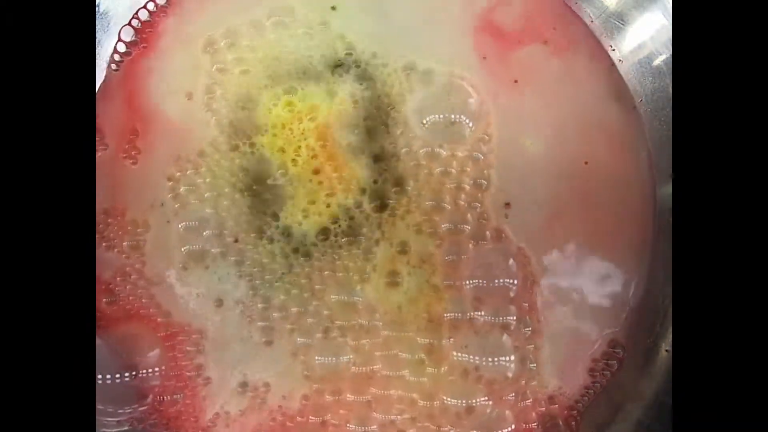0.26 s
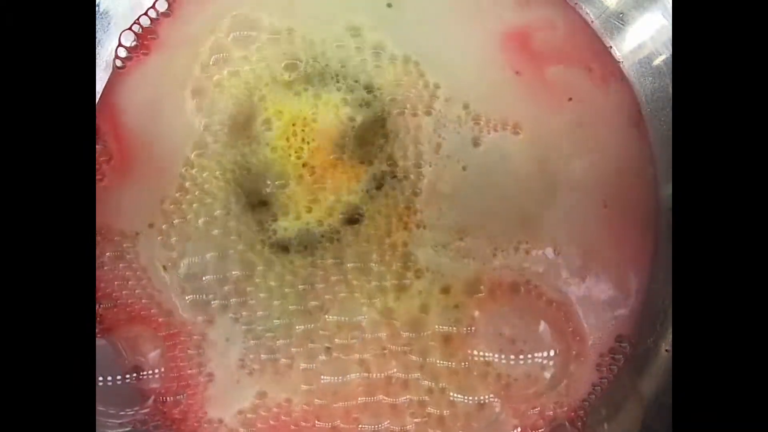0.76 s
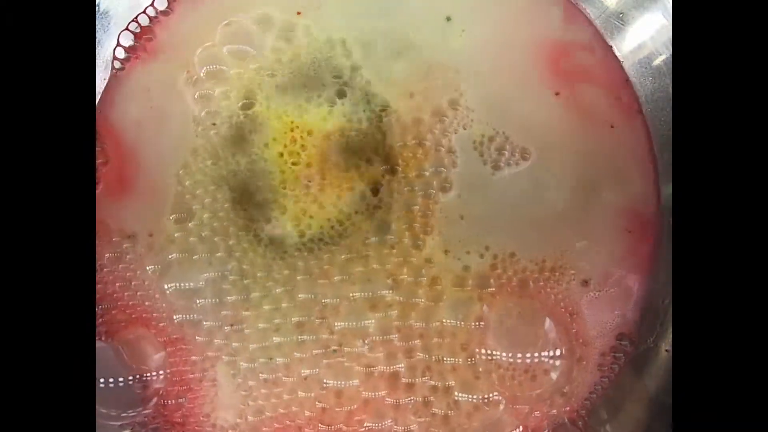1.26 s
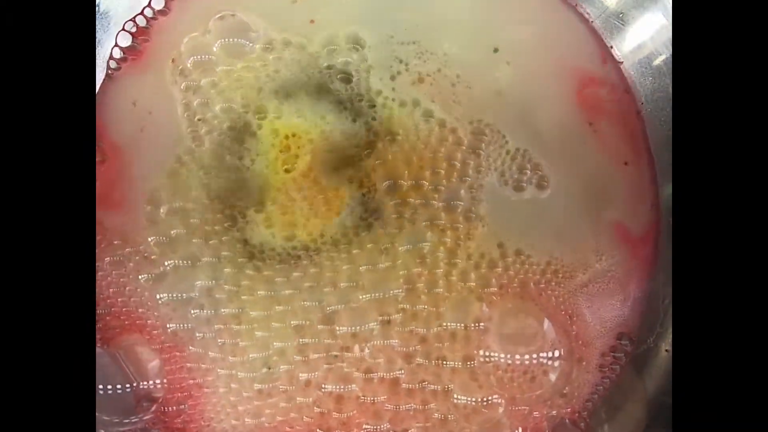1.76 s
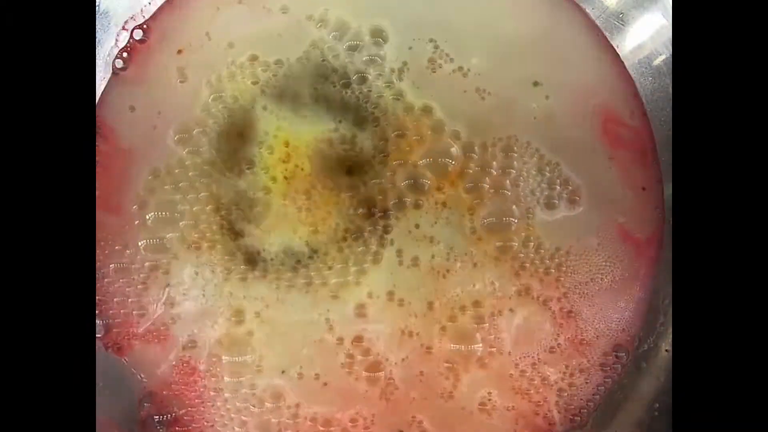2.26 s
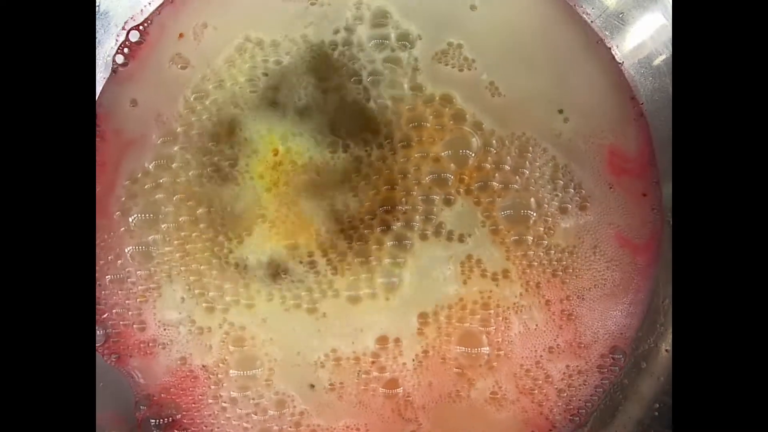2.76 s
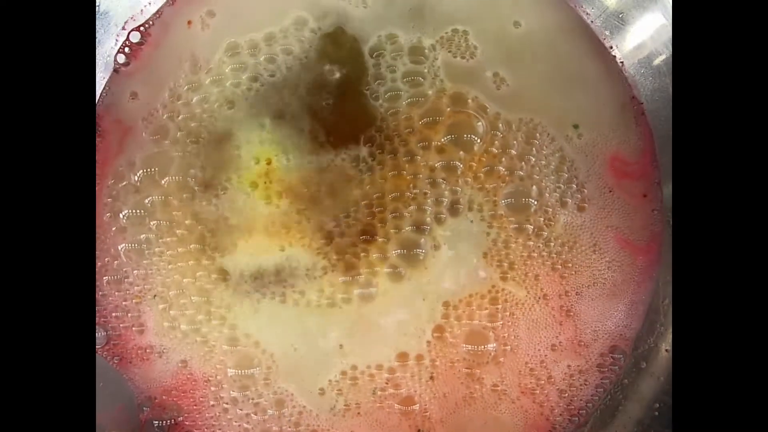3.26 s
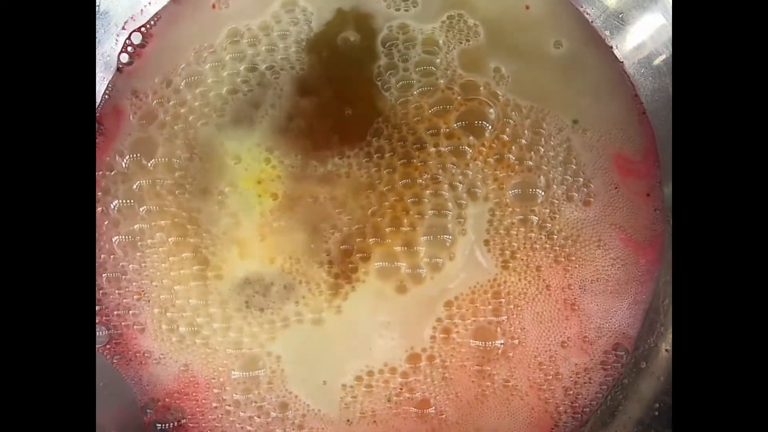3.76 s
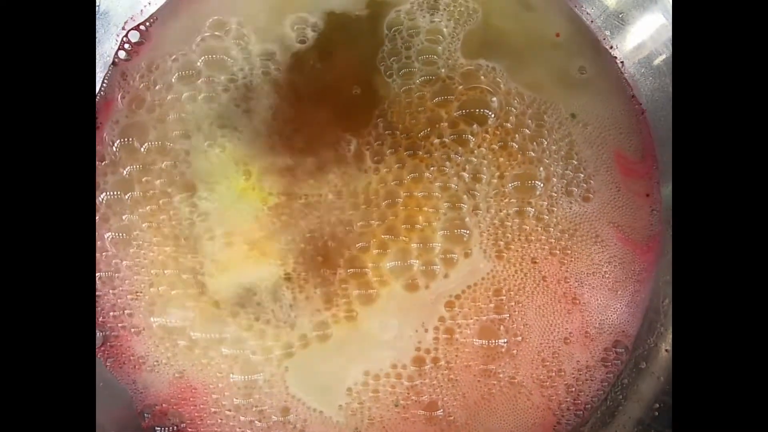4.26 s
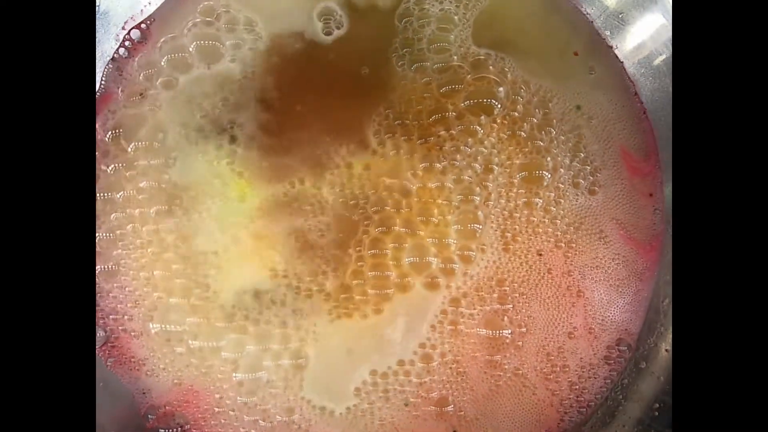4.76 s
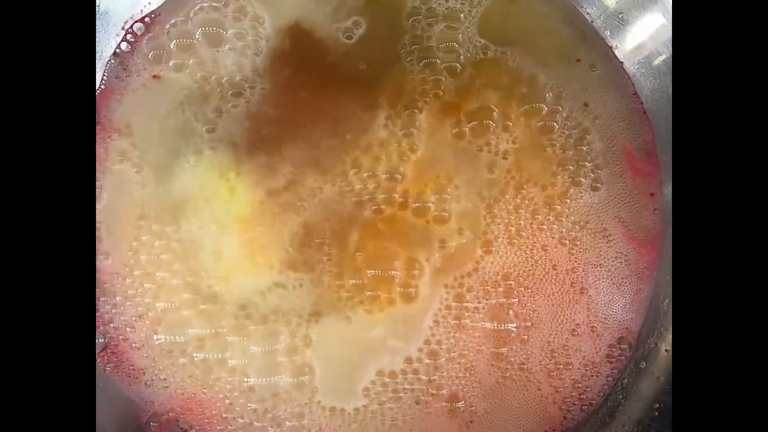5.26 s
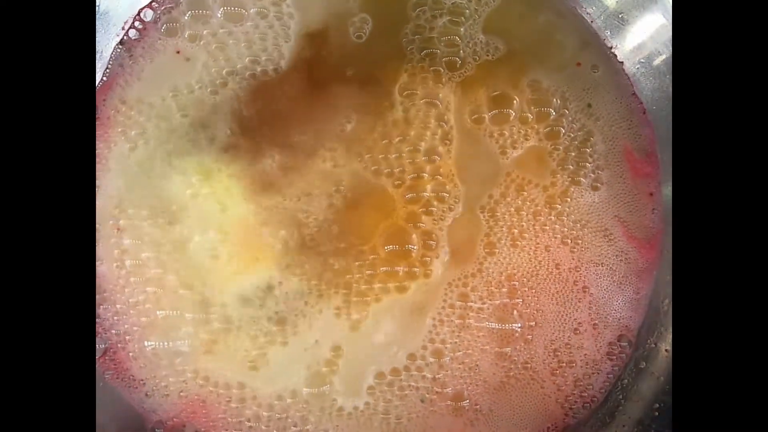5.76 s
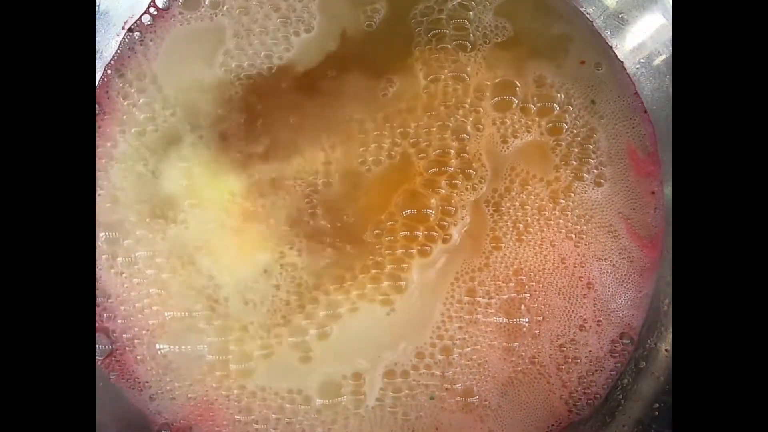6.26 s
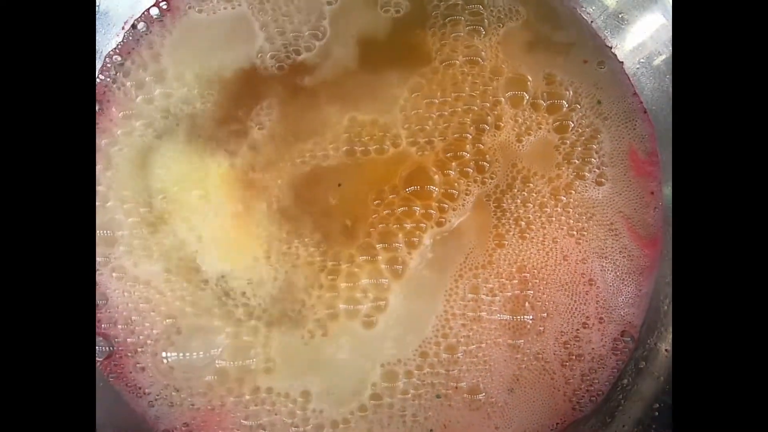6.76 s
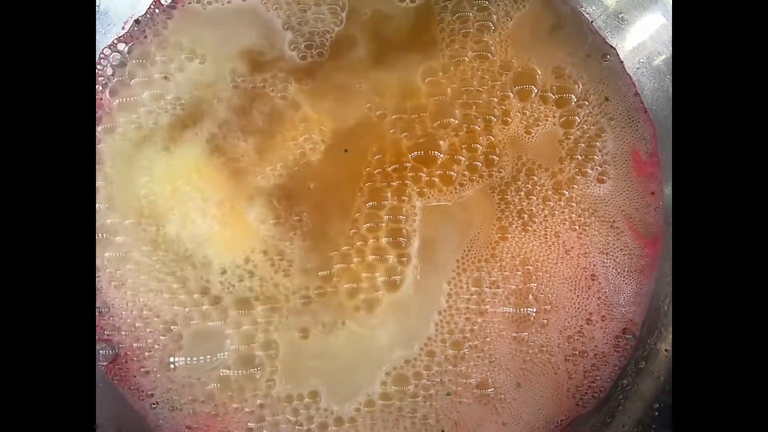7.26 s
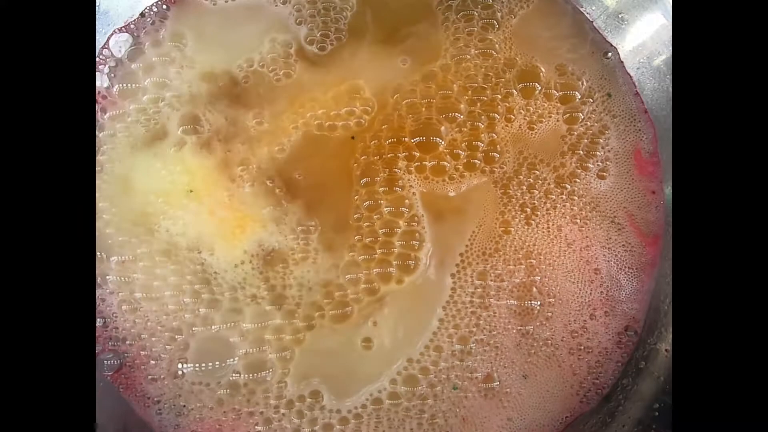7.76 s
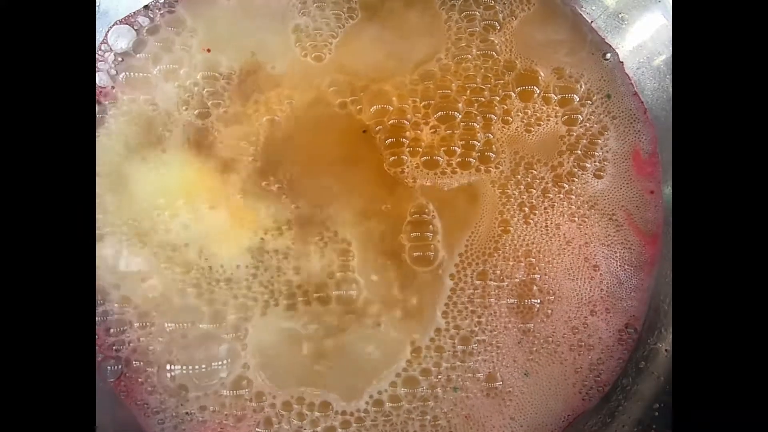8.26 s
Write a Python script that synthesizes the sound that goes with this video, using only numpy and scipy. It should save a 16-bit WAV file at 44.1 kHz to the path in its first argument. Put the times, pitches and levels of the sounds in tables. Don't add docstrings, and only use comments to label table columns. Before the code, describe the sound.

Close to the microphone, thousands of tiny gas bubbles burst in a continuous effervescent hiss. Coarser froth crackles at the start and gradually thins. Low indoor rumble and a faint wavering appliance hum sit far underneath. Midway a quick run of small hollow plops breaks out, then scattered ones and brief high pings, as a muffled, uneven engine drone slowly builds outside. The small stereo recorder sounds slightly hollow and fluttery.

```python
import sys
import numpy as np
from scipy import signal
from scipy.fft import rfft, irfft, next_fast_len
from scipy.io import wavfile
from scipy.ndimage import uniform_filter1d, map_coordinates

SR = 44100
rng = np.random.default_rng(int(sys.argv[2]) if len(sys.argv) > 2 else 0)


def ratio(d):
    e = np.asarray(d, float) / 20
    return 10 ** e


def wrap_up_sound(samples):
    columns = np.atleast_2d(samples).T
    tamed = np.clip(columns, -1, 1)
    steps = np.round(tamed * 32767).astype(np.int16)
    wavfile.write(sys.argv[1], SR, steps)


N = 375732

# (frequency [Hz], density [dB])
RUMBLE_COLOUR = [(15, -32), (25, -16), (58, -8), (80, -15), (100, -25), (125, -10.5), (165, -3), (215, -1),
                 (240, -7.5), (260, -12), (310, -17.5), (400, -54)]
# (frequency [Hz], density [dB])
MURK_COLOUR = [(200, -29), (270, 1), (330, 0), (450, -0.5), (570, 0), (700, -36)]
# (frequency [Hz], density [dB])
GURGLE_COLOUR = [(480, -30), (560, -9.5), (620, 0), (800, 1), (950, -3.5), (1200, -12), (1600, -35)]
# (time [s], nearness [dB])
TRAFFIC_NEARNESS = [(0, -6.5), (1.4, -6.5), (2.2, -4.5), (3.4, -1), (4.1, -0.5), (5.4, 1), (6, 0.5),
                    (6.5, 0), (8.52, 3)]
# (time [s], peak level [dB], half length [s])
GURGLE_SWELLS = [(.02, -75, .06), (3.3, -84, 0.39), (4.15, -80, .25), (5.2, -76.5, 1), (7.8, -75, 0.27)]
# (time [s], peak level [dB], half length [s])
HUM_SWELLS = [(.08, -67, 0.089), (.5, -69, 0.29), (1.08, -63.5, .32), (1.5, -71.5, 0.29), (2, -75, .35),
              (2.75, -74, 0.21), (3.3, -76.5, 0.11), (3.66, -77, .1), (4.05, -68, 0.15), (4.5, -73, 0.34),
              (5.14, -64, .16), (5.534, -74, .095)]
# (start [s], end [s], start pitch [Hz], end pitch [Hz], level [dB])
WHINES = [(3.6, 4.204, 194.5, 181.3, -66), (4.45, 4.8, 219, 209.6, -65), (5.1, 5.9, 190, 173.2, -68),
          (5.3, 5.697, 210.2, 212, -63.5), (5.6, 5.87, 49, 50, -57), (6.004, 6.952, 192.7, 177.3, -65),
          (6.05, 6.898, 235, 229, -66.5), (7.2, 7.898, 234, 227, -69), (7.85, 8.1, 108, 106, -61),
          (7.85, 8.5, 227.7, 211, -66), (8.1, 8.5, 39, 50.1, -56)]
# (time [s], pitch [Hz])
ENGINE_PITCH = [(3.9, 66.6), (6.2, 66.5), (6.6, 67.8), (7.3, 67.7), (7.6, 67.9), (8.52, 68)]
# (multiple of the pitch, level against the mean drone [dB])
ENGINE_OVERTONES = [(2, -20.5), (4.5, -30.5)]
# (time [s], peak level [dB], half length [s])
THROBS = [(4.175, -60, 0.021), (4.294, -64.0, 0.038), (4.414, -64.0, 0.032), (4.545, -59.5, 0.028),
          (4.683, -68, 0.097), (4.897, -59.0, 0.032), (5.033, -59, 0.071), (5.188, -57.5, 0.047),
          (5.323, -55.5, 0.068), (5.457, -48, 0.036), (5.559, -49, 0.053), (5.685, -56, 0.03),
          (5.751, -54.5, 0.081), (5.888, -50, 0.043), (5.99, -47.5, 0.049), (6.123, -50.5, 0.067),
          (6.293, -53, 0.048), (6.442, -49, 0.075), (6.621, -54, 0.035), (6.838, -51.5, 0.12),
          (6.946, -55.0, 0.052), (7.015, -57, 0.023), (7.23, -50, 0.109), (7.316, -50, 0.051),
          (7.608, -47.0, 0.081), (7.681, -52.0, 0.024), (7.91, -59.0, 0.111), (7.996, -45.0, 0.078),
          (8.231, -59, 0.05), (8.353, -49.5, 0.1)]
# (frequency [Hz], density [dB])
SHUDDER_COLOUR = [(15, -45), (30, -20), (42, 0), (52, 0.5), (62, -5), (80, -8), (105, -7), (125, -18),
                  (200, -41)]
# (time [s], peak level [dB], pitch [Hz], snap level against the note [dB])
PLOPS = [(2.169, -58, 945, 18), (3.016, -52, 729, -4), (3.743, -53, 598, -3), (3.9, -51, 697, -3),
         (3.925, -54, 614, -1), (3.999, -48, 690, 2), (4.1562, -44, 790, 4), (4.174, -49, 830, -3),
         (4.213, -49, 662, -6), (4.271, -49, 606, -10), (4.305, -54, 598, -2), (4.318, -48.5, 616, -9),
         (5.226, -51, 770, -4), (5.256, -52, 832, 3), (5.563, -51, 775, -4), (5.619, -57, 746, -2),
         (5.76, -50, 692, -4), (6.469, -50, 676, 1), (7.284, -52, 766, -2), (7.819, -50, 673, -10)]
# (time [s], peak level [dB], pitch [Hz])
PINGS = [
    (7.09, -45, 3150),
    (7.178, -41, 3040),
    (7.433, -46, 3220),
    (8.05, -51, 2350),
    (8.07, -50, 2580),
]
# (time [s], mist level [dB], large bubbles against the mist [dB])
FIZZ_COURSE = [(0, -41.5, -4.5), (1, -42, -6), (2, -42, -7.5), (3, -42.5, -10.5), (4, -44, -13.5),
               (4.6, -44, -14.5), (6.5, -44.5, -16), (8.52, -45.5, -12.5)]
# (frequency [Hz], density [dB])
MIST_COLOUR = [(600, -29.5), (1000, -24), (1750, -17), (2050, -10.5), (2700, -13.5), (3000, -5), (3600, -3),
               (4200, -3.5), (5000, -2), (7500, -1), (8400, -4), (9400, -3.5), (10500, -17.5), (12000, -45)]
# (frequency [Hz], density [dB])
FROTH_COLOUR = [(600, -29), (1000, -14), (1500, -7), (2200, -2), (2800, -0.5), (3600, 0.5), (4300, -5),
                (6000, -29), (10000, -22)]
# (frequency [Hz], density [dB])
SPRAY_COLOUR = [(8000, -40), (10000, -10), (11000, 1), (12300, 3.5), (13000, -3), (14000, -0.5),
                (15000, -5), (16000, -6.5)]
# (frequency [Hz], left-right correlation)
STEREO_LIKENESS = [(60, 0.43), (110, 0.34), (200, 0.53), (380, 0.16), (700, 0.3), (1290, 0.19), (2380, 0.7),
                   (4400, 0.84), (8120, -0.099), (15000, -0.079)]
# (frequency [Hz], left minus right [dB])
STEREO_LEAN = [(60, -1.5), (110, -5), (200, 0), (380, -1), (700, 2.5), (1290, 1.5), (2380, 1.5), (4400, 1),
               (8120, -1.5), (15000, 3)]
# (centre [Hz], half width [Hz], threshold [dB])
HOLLOW = (445, 135, -94)
# (start [s], end [s], centre [Hz], half width [Hz], threshold [dB])
BITES = [
    (.07, .38, 490, 70, -83),
    (.38, .95, 425, 55, -85),
    (1.06, 1.4, 400, 70, -84),
    (1.55, 1.8, 400, 90, -92),
    (1.92, 2.1, 480, 100, -90),
]
# (frequency [Hz], flutter [dB])
FLUTTER = [(1000, 0.089), (2500, .4), (5000, 0.86), (8000, 0.79), (12000, 1.6)]
# (time [s], depth [dB], recovery [s])
DROPOUT = (4.522, -10.5, 0.0095)


def unit(x):
    return x / np.sqrt(np.mean(x ** 2) + 1e-20)


def along(points, hz):
    f, value = np.transpose(points)
    return np.interp(np.log(hz + 1), np.log(f + 1), value)


def curves(rows):
    s, *columns = np.transpose(rows)
    return [np.interp(np.arange(N) / SR, s, column) for column in columns]


def wobble(rate):
    knots = rng.standard_normal(int(N * rate / SR) + 4)
    return map_coordinates(knots, [np.arange(N) * rate / SR])


def swells(rows):
    s, db, half = np.transpose(rows)[..., None]
    t = np.arange(0, N + 64, 64) / SR
    gain = np.sum(ratio(db) * np.exp(-((t - s) / half) ** 2), 0)
    return np.interp(np.arange(N) / SR, t, gain)


def filtered(x, response):
    m = next_fast_len(N + 8192)
    return irfft(rfft(x, m) * response(np.fft.rfftfreq(m, 1 / SR)), m)[..., :N]


def noise():
    return rng.standard_normal((2, N))


def spread(pair, colour):
    def mid_side(hz):
        angle = np.arccos(np.clip(along(STEREO_LIKENESS, hz), -1, 1)) / 2
        return ratio(along(colour, hz)) * [np.cos(angle), np.sin(angle)]

    mid, side = filtered(pair, mid_side)
    return np.array([mid + side, mid - side]) / np.sqrt(np.mean(mid ** 2))


def rumble():
    near_db, = curves(TRAFFIC_NEARNESS)
    shaken = ratio(-21.5) * uniform_filter1d(swells(THROBS), size=SR // 8)
    gain = ratio(-68 + 0.3 * near_db) + shaken
    return gain * ratio(2.15 + 1.1 * wobble(6)) * spread(noise(), RUMBLE_COLOUR)


def murk():
    near_db, = curves(TRAFFIC_NEARNESS)
    return ratio(-72 + near_db + 1.66 * wobble(8.2)) * spread(noise(), MURK_COLOUR)


def hum():
    phase = 2 * np.pi * 148 * np.arange(N) / SR + 0.44 * wobble(3.15)
    return np.sqrt(2) * swells(HUM_SWELLS) * np.sin(phase) * ratio([[-1.1], [1.1]])


def gurgle():
    gain = ratio(-69.5) + swells(GURGLE_SWELLS)
    return gain * ratio(1.83 * wobble(25)) * spread(noise(), GURGLE_COLOUR)


def whines():
    t, out = np.arange(N) / SR, np.zeros(N)
    for start, end, from_hz, to_hz, db in WHINES:
        hz = np.interp(t, [start, end], [from_hz, to_hz])
        fade = np.clip(np.minimum(t - start, end - t) / 0.1, 0, 1)
        out += fade * ratio(db + 2.5) * np.sin(2 * np.pi * np.cumsum(hz) / SR)
    return out * ratio(1.5 * wobble(7)) * [[1.1], [.8]]


def engine():
    hz, = curves(ENGINE_PITCH)
    phase = 2 * np.pi * np.cumsum(hz) / SR
    throb = swells(THROBS)
    drone = np.sqrt(2) * throb * np.sin(phase) * np.array([[1.06], [.97]])
    mean_throb = uniform_filter1d(throb, size=SR)
    overtones = np.zeros(N)
    for multiple, db in ENGINE_OVERTONES:
        gain = mean_throb * ratio(4 + db + 3.7 * wobble(8))
        overtones += gain * np.sin(multiple * phase + 0.76 * wobble(9))
    mid, side = filtered(noise(), lambda f: ratio(along(SHUDDER_COLOUR, f)))
    walls = unit(mid) + 0.29 * unit(side) * [[1], [-1]]
    shudder = throb * ratio(-10.5 + 1.5 * wobble(14)) * walls
    return drone + overtones + shudder


def plops():
    out, t = np.zeros(N + SR), np.arange(SR // 20) / SR
    snap_tone = np.sin(2 * np.pi * 1950 * t) + 0.32 * np.sin(2 * np.pi * 1350 * t)
    for s, db, hz, snap_db in PLOPS:
        rising = np.sin(2 * np.pi * hz * t * (1 + 3 * t))
        note = rising * ratio(-60 * t / 0.023) * (1 - np.exp(-t / 0.0012))
        snap = ratio(snap_db - 1.0 - 60 * t / .009) * snap_tone
        out[round(s * SR):][:len(t)] += ratio(db + 4.5) * (note + snap)
    for s, db, hz in PINGS:
        ping = np.sin(2 * np.pi * hz * t) * (1 - np.exp(-t / .002))
        out[round(s * SR):][:len(t)] += ratio(db + 4.5 - 60 * t / 0.057) * ping
    return out[:N] * ratio([[1.1], [-1.1]])


def bursts(low_hz, high_hz, cycles, scatter_db, count):
    when, size, big = rng.random((3, count, 1))
    hz = low_hz * (high_hz / low_hz) ** size
    t = np.arange(96) / SR
    decay = ratio(scatter_db * big - 30 * hz * t / cycles)
    ring = hz * decay * np.sin(2 * np.pi * hz * t)
    place = (when * 2 * N).astype(int) + np.arange(len(t))
    swarm = np.bincount(place.ravel(), ring.ravel(), 2 * N + len(t))
    swarm = swarm[:2 * N].reshape(2, N)
    return 0.34 * unit(swarm) + noise()


def fizz():
    mist_db, large_db = curves(FIZZ_COURSE)
    stir_db = 0.14 * wobble(5.1)
    bare_db = -np.exp(-(np.arange(N) / SR / 1.2) ** 2)

    mist = spread(bursts(2420, 12400, cycles=3.1, scatter_db=3.5, count=45000), MIST_COLOUR)
    mist = mist * ratio(mist_db + 1.5 + stir_db + 0.23 * wobble(11))
    froth = spread(bursts(1420, 5860, cycles=3.2, scatter_db=11.0, count=25000), FROTH_COLOUR)
    froth = froth * ratio(mist_db + large_db + 3.0 + stir_db)
    spray = ratio(mist_db - 21.5 + bare_db) * spread(noise(), SPRAY_COLOUR)
    return mist + froth + spray


def scene():
    return rumble() + murk() + hum() + gurgle() + whines() + engine() + plops() + fizz()


def noise_reduction(z, hz, s):
    def band(centre, width, db):
        return ratio(2 * db) * np.exp(-((hz[:, None] - centre) / width) ** 4)

    threshold = band(*HOLLOW)
    for start, end, *shape in BITES:
        threshold = threshold + band(*shape) * (s > start) * (s < end)
    patches = uniform_filter1d(rng.standard_normal(threshold.shape), size=3, axis=0)
    patches = unit(uniform_filter1d(patches, size=2, axis=1))
    threshold = threshold * ratio(4 + 6 * patches)
    power = uniform_filter1d(np.mean(abs(z) ** 2, 0), size=2, axis=0)
    power = uniform_filter1d(power, size=3, axis=1)
    keep = np.clip(1 - threshold / (power + 1e-20), .04, 1)
    return keep * ratio(along(FLUTTER, hz)[:, None] * patches)


def top_edge(hz, s):
    edge_hz, open_share = 15060, .2
    is_open = rng.random(len(s)) < open_share
    reach = edge_hz + is_open * rng.uniform(100, 550, len(s))
    return np.where(hz[:, None] > edge_hz, ratio(-4), 1) * (hz[:, None] < reach)


def dropout():
    s, db, recovery = DROPOUT
    t = np.arange(N) / SR - s
    return ratio(db * (t > 0) * np.exp(-(t / recovery) ** 2))


def roll_off(x):
    return signal.sosfilt(signal.butter(12, 15630, fs=SR, output="sos"), x)


def record(dry):
    x = filtered(dry, lambda hz: ratio(along(STEREO_LEAN, hz) * [[.5], [-.5]]))
    hz, s, z = signal.stft(x, SR, nperseg=2048)
    keep = noise_reduction(z, hz, s) * top_edge(hz, s)
    x = signal.istft(z * keep, SR, nperseg=2048)[1][:, :N]
    return roll_off(x * dropout())


dry = scene()
out = record(dry)
wrap_up_sound(out)
```